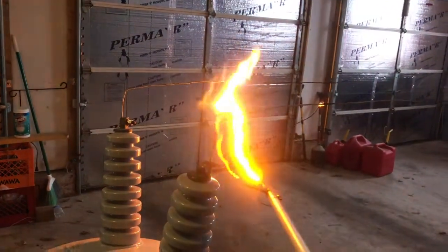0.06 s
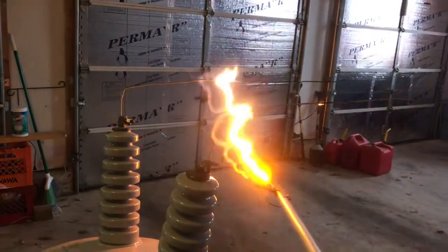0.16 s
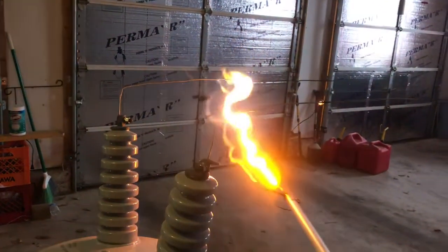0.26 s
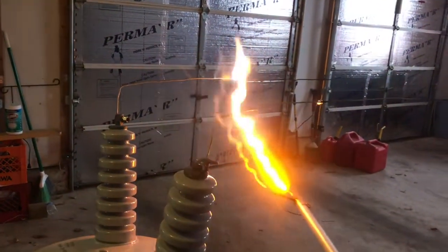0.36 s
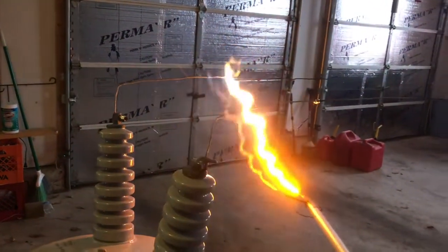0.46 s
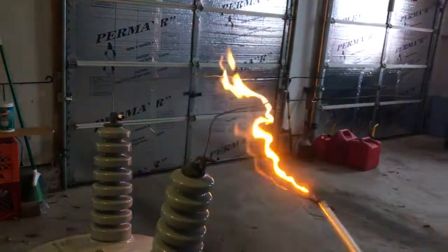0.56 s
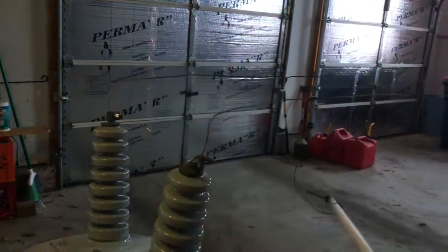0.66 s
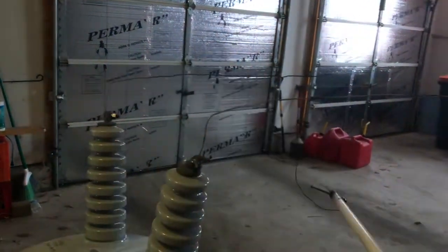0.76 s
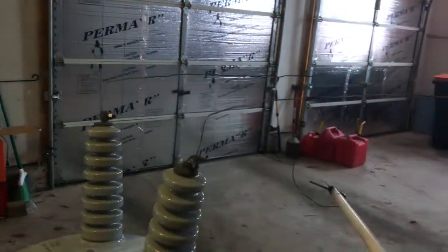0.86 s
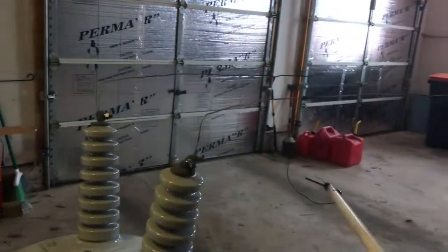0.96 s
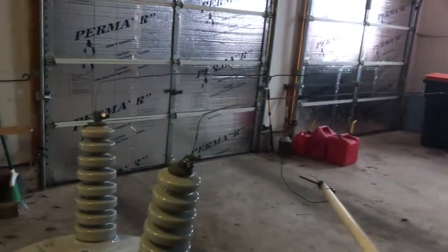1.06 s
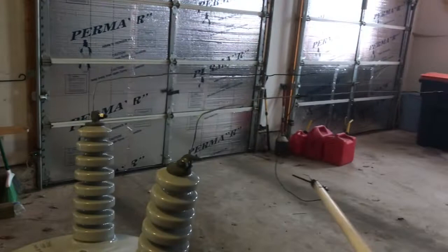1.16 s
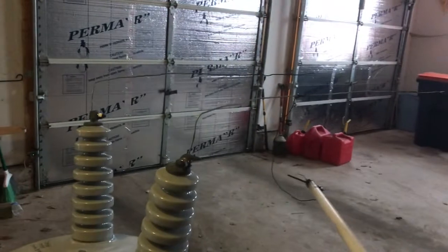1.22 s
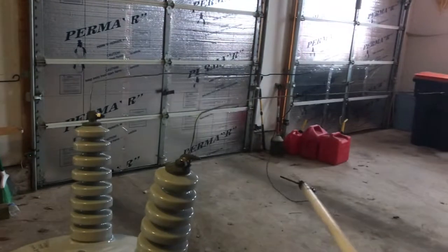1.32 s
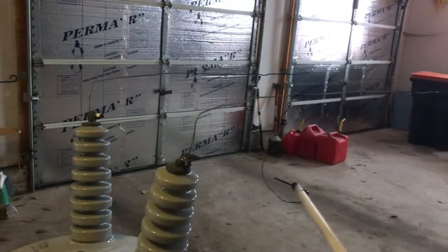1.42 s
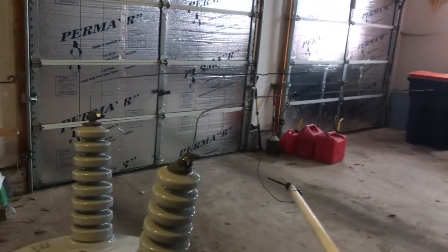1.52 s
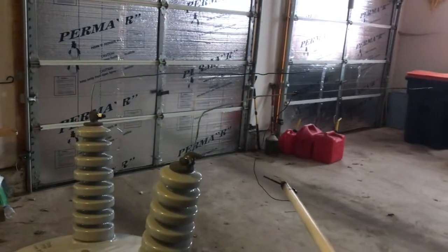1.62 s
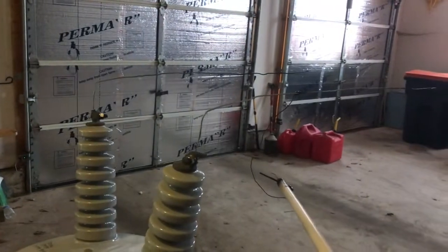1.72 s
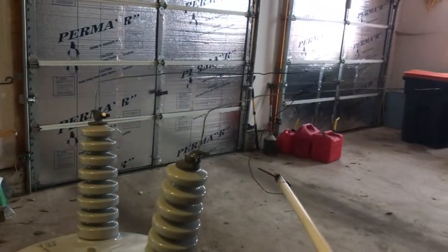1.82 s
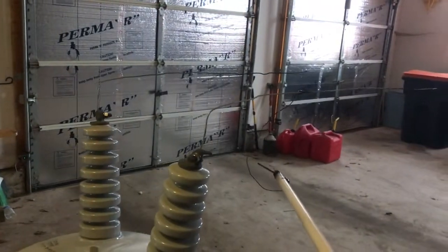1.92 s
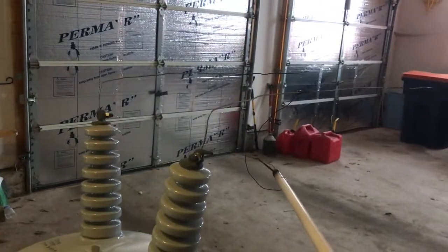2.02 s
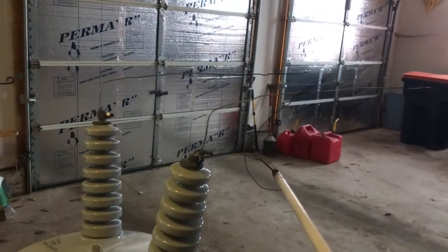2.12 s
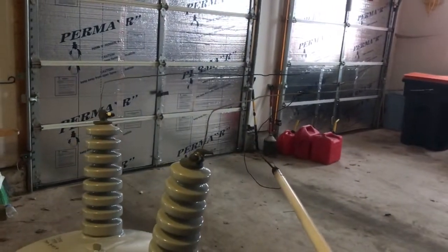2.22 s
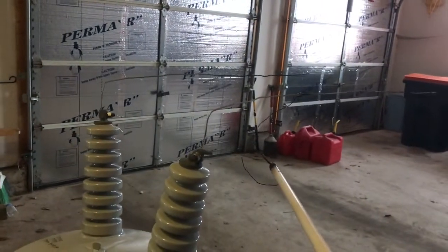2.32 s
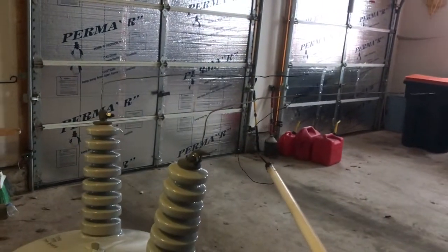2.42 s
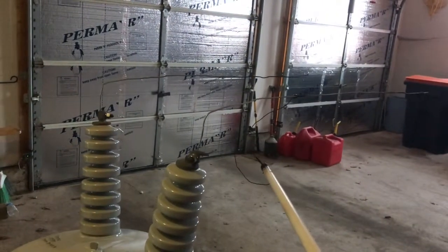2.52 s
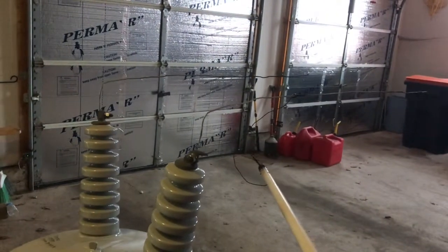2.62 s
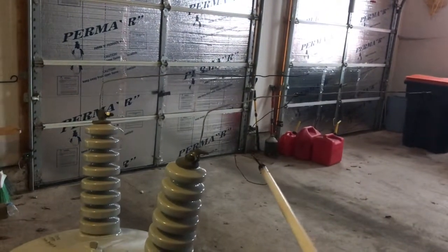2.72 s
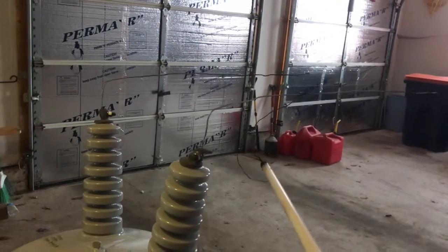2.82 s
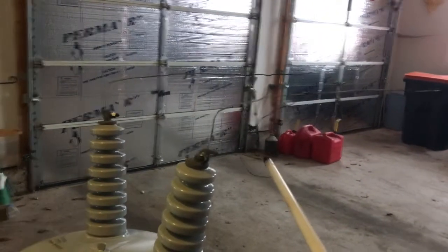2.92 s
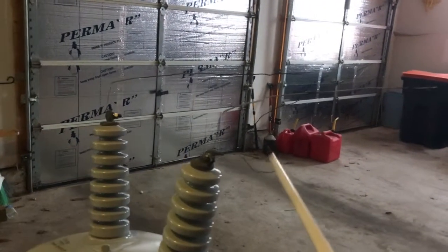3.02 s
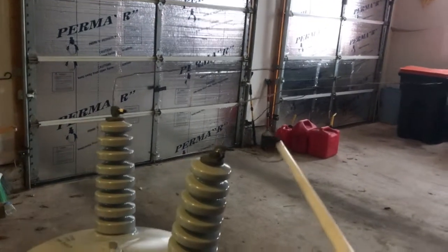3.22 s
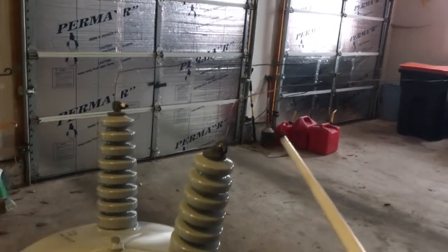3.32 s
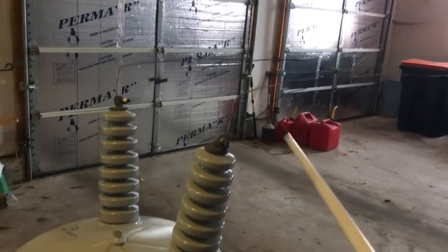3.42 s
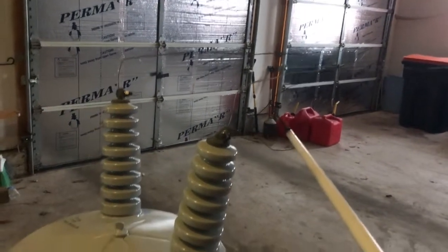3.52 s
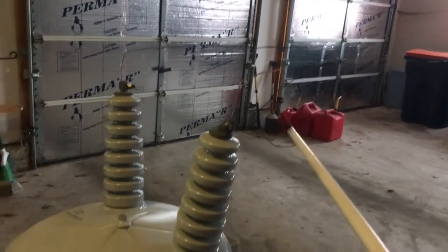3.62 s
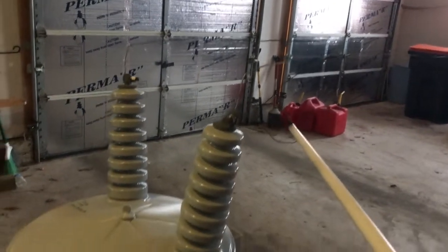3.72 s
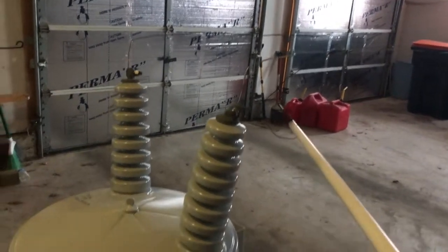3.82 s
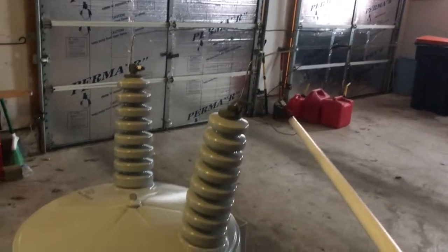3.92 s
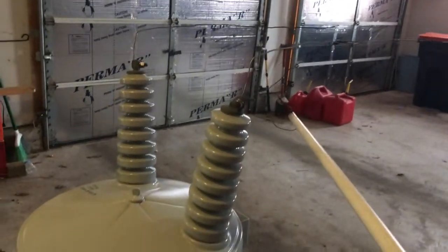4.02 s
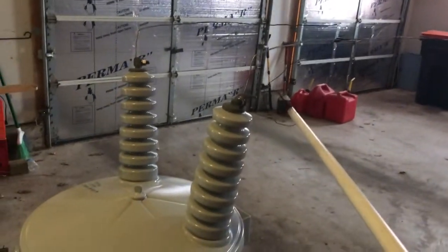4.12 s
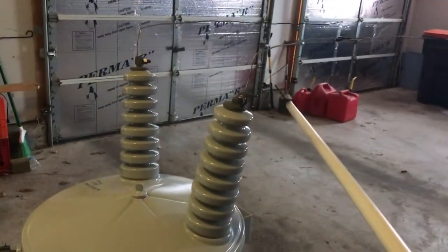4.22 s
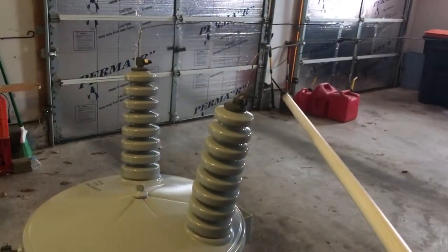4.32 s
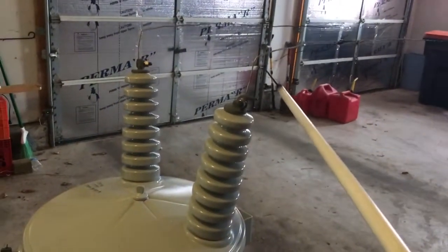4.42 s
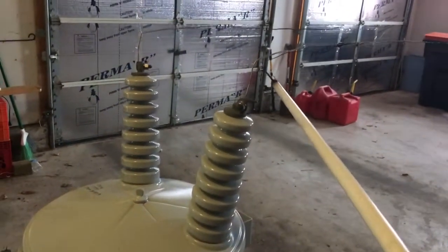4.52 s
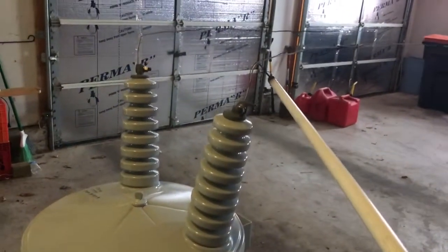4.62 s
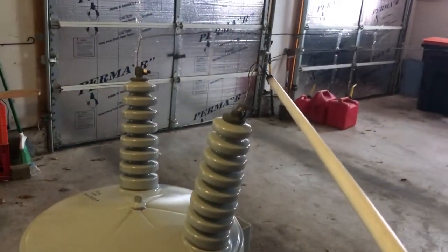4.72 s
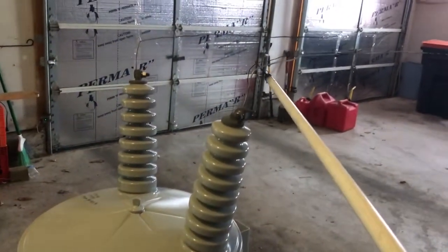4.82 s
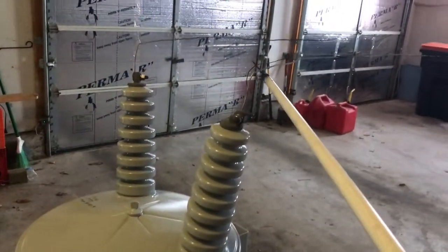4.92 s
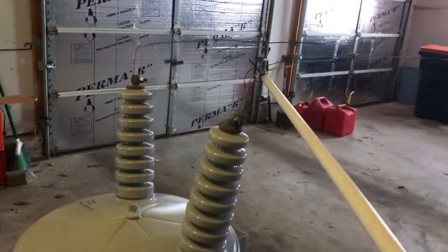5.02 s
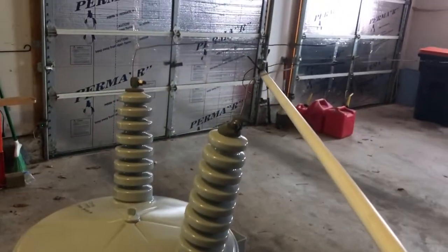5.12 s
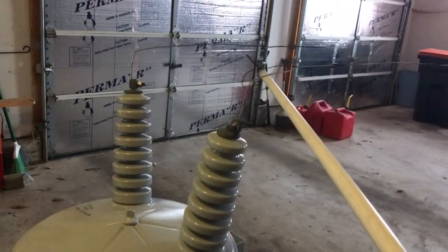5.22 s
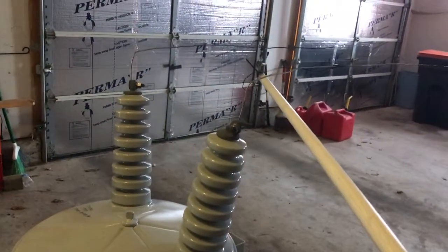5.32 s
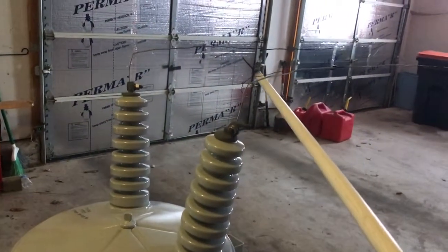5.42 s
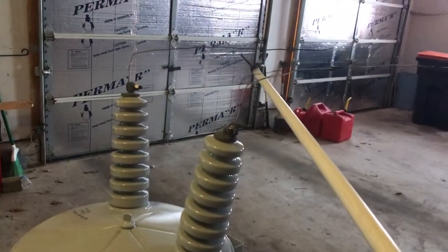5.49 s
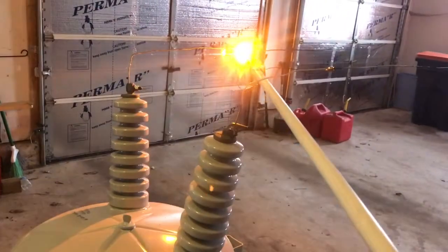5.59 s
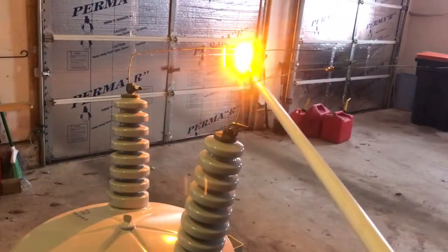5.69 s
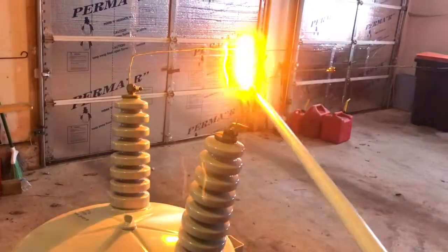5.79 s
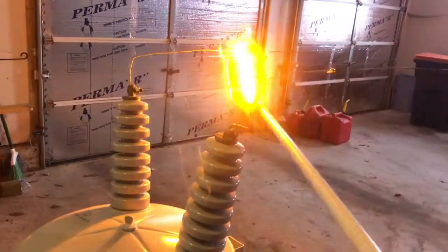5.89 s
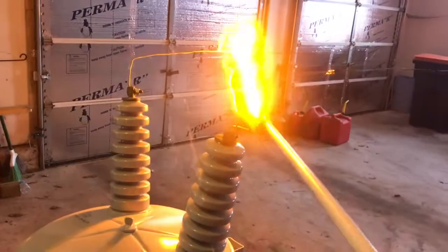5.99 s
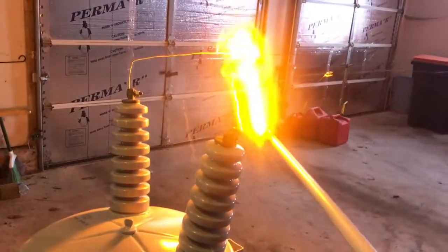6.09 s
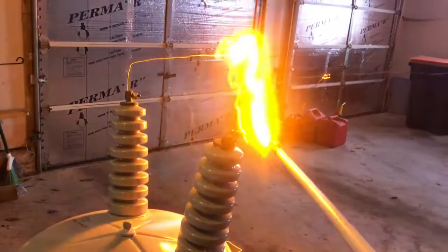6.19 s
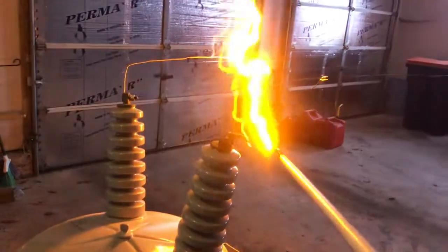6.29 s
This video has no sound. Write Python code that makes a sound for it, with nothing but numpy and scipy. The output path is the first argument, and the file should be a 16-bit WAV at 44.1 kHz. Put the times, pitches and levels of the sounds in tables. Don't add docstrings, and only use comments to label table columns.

```python
import sys
import numpy as np
from scipy import signal
from scipy.fft import rfft, irfft, next_fast_len
from scipy.io import wavfile
from scipy.ndimage import map_coordinates

SR = 44100
rng = np.random.default_rng(int(sys.argv[2]) if len(sys.argv) > 2 else 0)


def magnitude_from_level(level_db):
    exponent = np.asarray(level_db, float) / 20
    return 10 ** exponent


def output_pcm(signal):
    pcm = np.clip(np.atleast_2d(signal).T, -1, 1) * 32767
    wavfile.write(sys.argv[1], SR, np.round(pcm).astype(np.int16))


N = 280035
T = np.arange(N) / SR
MAINS_HZ, HEAT_PEAK_S = 60.035, 0.0682
TEAR_S = 0.652


def in_time(rows):
    s, *columns = np.transpose(rows)
    return [np.interp(T, s, c) for c in columns]


def while_on(rows, fade_s=0.049):
    start_s, end_s = rows[0][0], rows[-1][0]
    rise = T - start_s + fade_s * (start_s == 0)
    fall = end_s - T + fade_s
    return np.clip(np.minimum(rise, fall) / fade_s, 0, 1)


def at_hz(points, hz):
    point_hz, value = np.transpose(points)
    return np.interp(np.log(hz + 1), np.log(point_hz), value)


def colour(x, points):
    size = next_fast_len(N + 4096)
    gain = magnitude_from_level(at_hz(points, np.fft.rfftfreq(size, 1 / SR)))
    return irfft(rfft(x, size) * gain, size)[:N]


def rms_one(x):
    return x / np.sqrt(np.mean(x ** 2) + 1e-20)


def butter(x, hz, kind, order=2):
    return signal.sosfilt(signal.butter(order, hz, kind, fs=SR, output="sos"), x)


def steep_top(x, hz):
    return signal.sosfilt(signal.cheby2(14, 60, hz, fs=SR, output="sos"), x)


def drift(rate_hz):
    knots = rng.standard_normal(400)
    coarse = map_coordinates(knots, [T[::64] * min(rate_hz, 60)], order=3)
    return np.interp(T, T[::64], coarse)


def place(times_s, pulses):
    out = np.zeros(N + 8192)
    for s, pulse in zip(times_s, pulses):
        start = round(s * SR)
        out[start:start + len(pulse)] += pulse
    return out[:N]


def mains(order, lead_rad=0.):
    return np.sqrt(2) * np.cos(2 * np.pi * order * MAINS_HZ * (T - HEAT_PEAK_S) + lead_rad)


# collapse_s, standing_share
COLLAPSE = [
    (0.0464, 1),
    (0.0065, 0.69),
    (0.016, -0.79),
]


def after_tear(collapse_s, share):
    u = np.maximum(T - TEAR_S, 0) * (T < 3)
    standing = magnitude_from_level(-105 * u)
    return (1 + share) * np.exp(-u / collapse_s) - share * standing


# time_s, heating_db, writhing_db, turbulence_db
ARCS = [
    [(0, -26, -3, -2.5), (.1, -25.5, -6, -7), (.178, -23.5, -4, -1.5), (.26, -25.5, 1, -4.5),
     (.35, -26.5, 4.5, -2.5), (.45, -25, -5, -3), (.54, -25.5, 0.5, 2), (.645, -24.5, -3, -8)],
    [(5.74, -37.5, 2, -16), (5.8, -50.5, 6, -14), (5.93, -36, 3.5, -12), (6.06, -33.5, 2, -9),
     (6.115, -29, 0, 6), (6.24, -26.5, -2, -3), (6.32, -26, -1, 8), (6.35, -21.5, -7, 1)],
]
# second_partial_db, upper_orders_db, wander_0_1, roar_db, hiss_db, tick_db
ARC_VOICE = [
    (-3, -10.5, 0.88, -38, -4.5, -39.5),
    (-7.5, -12, 0.03, -54.5, 2.5, -24.5),
]
# pitch_hz, level_db
ARC_ORDERS = [
    [(180, -3), (300, -51), (360, 1), (420, -32), (480, -5), (540, -12), (600, 0.5), (660, -10.5),
     (720, -7)],
    [(180, -21), (360, 2.5), (480, -6.5), (540, -24), (600, 1.5), (720, -13), (840, -19), (1080, -8),
     (1200, -42), (1320, -22), (1560, -28), (1920, -20), (2400, -22)],
]


def arc_hum():
    first, second, rest = [after_tear(*row) for row in COLLAPSE]
    out = 0
    for rows, orders, (second_db, upper_db, wander, *_) in zip(ARCS, ARC_ORDERS, ARC_VOICE):
        heat_db, writhe_db, _ = in_time(rows)
        upper = 0
        for hz, db in orders:
            level_db = db + 2.0 * wander * drift(14) + 1.04 * writhe_db * (hz > 1000)
            lead_rad = rng.uniform(-np.pi, np.pi) + 0.24 * wander * drift(7.4)
            upper = upper + magnitude_from_level(level_db) * mains(round(hz / MAINS_HZ), lead_rad)
        second_gain = magnitude_from_level(second_db + 0.53 * writhe_db)
        low = first * mains(2, 0.088)
        low = low + second * second_gain * mains(4, -0.45 + 0.72 * wander * drift(20))
        heard = while_on([rows[0], [rows[-1][0] + 1]])
        out = out + heard * magnitude_from_level(heat_db) * (low + rest * magnitude_from_level(upper_db + writhe_db - 3.5) * upper)
    return out


# pitch_hz, density_db_per_hz
ROAR = [(60, -42), (150, 3), (300, 1), (700, -1.5), (1200, 0.5), (2550, -11), (4000, -25), (9000, -28),
        (16000, -38)]


def arc_roar():
    heat = (1 + mains(1.8, 1.28) / np.sqrt(2)) / 2
    flutter = magnitude_from_level(0.34 * drift(60) + 1.35 * mains(0.99, 1.53))
    noise = rms_one(colour(rng.standard_normal(N), ROAR)) * (0.36 + heat ** 2) * flutter
    dull = butter(noise, 4400, "low", order=4)
    hiss = noise - dull

    zeros_s = HEAT_PEAK_S + (np.arange(-8, 754) + 0.42) / (2 * MAINS_HZ)
    count = len(zeros_s)
    odd, chance = np.arange(count) % 2, rng.standard_normal(count)
    grains = rng.standard_normal((count, 40)) * np.exp(-np.arange(40) / 6.3)
    grains = grains / np.std(grains, axis=1, keepdims=True) / 3

    out = 0
    tick_spread_db, tick_odd_db = (6.0, 1.5), (-3, -16)
    for rows, voice, spread_db, odd_db in zip(ARCS, ARC_VOICE, tick_spread_db, tick_odd_db):
        *_, roar_db, hiss_db, tick_db = voice
        swirl_db = in_time(rows)[-1]
        tick_gain = magnitude_from_level(spread_db * chance + odd_db * odd)[:, None]
        ticks = butter(place(zeros_s, grains * tick_gain), 5700, "high")
        turbulent = magnitude_from_level(swirl_db) * dull + magnitude_from_level(hiss_db + 0.27 * swirl_db) * hiss
        out = out + while_on(rows) * (magnitude_from_level(roar_db + 5.5) * turbulent + magnitude_from_level(tick_db - 4.5) * ticks)
    return out


# start_s, peak_db, crack_hz
SPARKS = [(.002, -33.5, 7000), (0.0645, -14.5, 5460), (.0964, -26.5, 8000), (.1466, -24, 4650),
          (0.1543, -27, 12000), (0.1707, -26.5, 10000), (0.395, -40, 9000), (0.413, -37, 9000),
          (0.422, -27, 9000), (0.4234, -19, 6750), (0.4293, -34, 6000), (.4375, -36, 9000),
          (0.454, -28, 8000), (0.471, -24, 6700), (.4875, -30, 10000), (0.4979, -25, 4800),
          (0.6134, -14.5, 5600), (5.6057, -31.5, 5800), (5.6226, -31.5, 5700), (5.6383, -30, 6050),
          (5.6477, -1.5, 10350), (6.018, -36, 9900), (6.0862, -27, 9700), (6.103, -30.5, 8000),
          (6.105, -38.5, 3750), (6.2348, -29.5, 10000), (6.252, -30, 11000), (6.2612, -11.5, 4750),
          (6.2697, -18.5, 10000)]


def sparks():
    s, peak_db, crack_hz = np.transpose(SPARKS)[:, :, None]
    t, peak_s = np.arange(220) / SR, 0.0008
    body_db = 0.5 - 19 * np.log2(crack_hz / 5000)
    crack = np.exp(-((t - peak_s) * crack_hz / 0.44) ** 2) * np.sin(2 * np.pi * crack_hz * (peak_s - t))
    body = butter(1. * (np.arange(220) == 34), [800, 3300], "band")
    crackle = rng.standard_normal((len(s), 220)) * np.exp(-t / 0.001) * (t > peak_s)
    crackle = butter(crackle, 1900, "high")
    clean = magnitude_from_level(peak_db) * (1.53 * crack + 9.35 * magnitude_from_level(body_db) * body)
    restrike = (s > 5.6) & (s < 5.7)
    room_db = np.where(restrike, 4.5, -5.5)
    direct = place(s[:, 0], clean + 0.5 * magnitude_from_level(peak_db) * crackle)
    return direct, place(s[:, 0], clean * magnitude_from_level(room_db))


def puff():
    push = butter(-1. * (np.arange(1500) == 0), [134, 427], "band")
    direct = place([TEAR_S], [magnitude_from_level(-23) * push / np.abs(push).max()])
    return direct, magnitude_from_level(2.5) * direct


# pitch_hz, level_db
CLACK = [(200, 8.5), (400, 3), (600, 11.5), (800, -4), (1500, 1.5), (3000, -4), (5000, -8.5), (7000, 3),
         (9000, -2.5), (12000, -12.5), (16000, -15)]


def clack():
    start_s, peak_db, room_db, build_s = 3.329, -20.5, -21, 0.0018
    t = np.arange(600) / SR
    contacts = rng.standard_normal(600) * (rng.random(600) < 0.12)
    contacts = contacts * (t / build_s) * np.exp(1 - t / build_s)
    direct = place([start_s], [magnitude_from_level(peak_db) * contacts / np.abs(contacts).max()])
    blow = place([start_s], [[magnitude_from_level(room_db + 11)]])
    return colour(direct, CLACK), colour(blow, CLACK)


# start_s, peak_db, ring_hz, rattle_s
CLICKS = [(1.3668, -46.5, 2130, .004), (1.83, -62, 1240, .004), (2.022, -46, 6150, .001),
          (2.029, -53.5, 2650, .004), (2.029, -48, 7950, .001), (2.191, -53, 1370, .005),
          (2.536, -45.5, 2040, .004), (2.54, -51, 6000, .002), (2.6158, -43, 1610, .002),
          (2.898, -41.5, 1140, .001), (2.966, -63, 960, .002), (3.1794, -52, 2060, .003)]


def clicks():
    t, pulses = np.arange(500) / SR, []
    shape = (len(CLICKS), 500)
    touches = rng.standard_normal(shape) * (rng.random(shape) < 0.04)
    for (s, db, hz, rattle_s), touch in zip(CLICKS, touches):
        hits = (t == 0) + touch * (t < rattle_s)
        rung = butter(hits, [hz / 4, hz * np.sqrt(2)], "band", order=3)
        pulses.append(magnitude_from_level(db) * rung / np.abs(rung).max())
    s, db = np.transpose(CLICKS)[:2]
    room_db = -45 - db + 0.33 * (db - db.mean())
    feed = place(s, pulses * magnitude_from_level(room_db)[:, None])
    return place(s, pulses), butter(feed, 2330, "low")


# start_s, peak_db, pitch_hz
THUMPS = [(0.346, -27, 114), (1.234, -39, 122), (1.248, -13, 123.7), (2.019, -67, 116), (2.287, -30, 121),
          (2.314, -43, 130), (2.444, -17.5, 117), (2.603, -35, 131), (2.826, -41.5, 103),
          (3.099, -37.5, 112), (3.17, -43, 108), (3.22, -43, 116), (3.272, -40, 113), (3.511, -43.5, 111),
          (3.578, -45, 114), (3.67, -28.5, 109), (3.743, -39, 112), (3.805, -40.5, 124),
          (3.819, -34, 116.4), (3.844, -24.5, 113), (4.272, -44, 117), (4.465, -46.5, 114),
          (4.613, -31, 125), (5.043, -31, 140), (5.092, -32.5, 116), (5.429, -43, 136), (5.647, -39.5, 123),
          (5.73, -38, 121)]


def thumps():
    t, pulses = np.arange(3000) / SR, []
    for s, db, hz in THUMPS:
        cycles = hz * (0.68 * t + 0.01 * (1 - np.exp(-t / 0.0049)))
        swell = (t * hz / 1.134) ** 2.6 * np.exp(2.56 * (1 - t * hz / 1.112))
        pulses.append(-magnitude_from_level(db) * np.sin(2 * np.pi * cycles) * swell)
    return place(np.array(THUMPS)[:, 0], pulses)


# start_s,
# peak_db, ring_hz
KNOCKS = [(1.237, -41, 523), (1.249, -36, 406), (2.286, -54, 350), (2.314, -35, 530), (2.444, -70, 400),
          (2.601, -42.5, 305), (2.9, -51, 350), (2.913, -51, 260), (2.9185, -46, 300), (2.929, -48, 298),
          (3.328, -36.5, 590), (3.812, -52, 510), (3.847, -46, 454), (4.259, -54, 398), (4.607, -47, 380),
          (5.046, -62, 343), (5.086, -45, 394), (5.431, -38.5, 255), (5.435, -32, 533), (5.651, -30, 394)]


def knocks():
    t, pulses = np.arange(600) / SR, []
    for s, db, hz in KNOCKS:
        swing = np.sin(2 * np.pi * hz * t) * np.exp(-t * hz / 0.85)
        pulses.append(magnitude_from_level(db + 3.5) * swing * (1 - np.exp(-t / 0.00076)))
    return place(np.array(KNOCKS)[:, 0], pulses)


# mains_order, level_db
WHINE = [(52, -13), (54, -11), (58, 0), (60, -1), (62, -9), (64, -13), (66, -13), (68, -14), (70, -13),
         (114, -14), (118, -7), (120, -7), (122, -9)]


def ballast_whine():
    sway_period_s, sway_peak_s = 2.5, 2.8
    sway_db = 4 * np.cos(2 * np.pi * (T - sway_peak_s) / sway_period_s)
    out = 0
    for order, db in WHINE:
        line_sway_db = sway_db * (-1) ** (order // 2) * (order < 100)
        out = out + magnitude_from_level(db + 1.5 * drift(2.5) + line_sway_db) * mains(order, 0.5 * drift(5))
    approach_db = 1.0 * (T - T.mean())
    return magnitude_from_level(-80 + approach_db) * out


# mains_order, level_db
TRANSFORMER = [(1, -8.5), (2, -2.5), (4, -6.5), (6, -11)]


def transformer_hum():
    partials = [magnitude_from_level(db + 3.7 * drift(5.6)) * mains(order, drift(2.024)) for order, db in TRANSFORMER]
    return magnitude_from_level(-67) * sum(partials)


# time_s, level_db
GRIP = [(0, -51), (1.1, -62.5), (1.9, -61), (2.4, -56.5), (3.1, -57.5), (3.32, -48.5), (3.45, -61),
        (3.8, -57), (4.1, -62), (6.35, -60)]
# pitch_hz, density_db_per_hz
RUMBLE = [(15, -52), (30, -17.5), (60, 8.5), (100, -4.5), (160, -13), (300, -15.5), (600, -71)]
# pitch_hz, density_db_per_hz
AIR = [(100, -7.5), (200, -7), (350, -11.5), (500, -15), (1000, -18.5), (2600, -23), (3000, -25),
       (4800, -25), (5800, -22), (7800, -25.5), (8900, -23), (10500, -29), (14700, -27), (16500, -44)]


def rumble_and_air():
    grip_db, = in_time(GRIP)
    rumble = rms_one(colour(rng.standard_normal(N), RUMBLE)) * magnitude_from_level(grip_db + 2.5 * drift(14))
    air_db = -67.5 + 0.05 * (grip_db - grip_db.mean())
    air = rms_one(colour(rng.standard_normal(N), AIR)) * magnitude_from_level(air_db)
    return rumble + air


# delay_s, level_db
ECHOES = [(.0043, -11), (.0075, -12), (.0143, -6), (.024, -14), (.036, -10)]


def echoes(x):
    return sum(magnitude_from_level(db) * np.pad(x, (round(s * SR), 0))[:N] for s, db in ECHOES)


# pitch_hz, t60_s
ROOM_T60 = [(120, 0.86), (500, 0.92), (1400, 1), (3700, 0.98), (9000, 0.51), (16000, 0.38)]


def garage(x):
    t = np.arange(round(1.3 * SR)) / SR
    edges_hz = 75 * 2 ** np.arange(0, 8.4, 0.5)
    white = rng.standard_normal((2, len(t)))
    tail = 0
    for k, (low, high) in enumerate(zip(edges_hz, edges_hz[1:])):
        decay = magnitude_from_level(-60 * t / at_hz(ROOM_T60, np.sqrt(low * high)))
        tail = tail + butter(white[k % 2], [low, high], "band") * decay
    grain = np.repeat(rng.standard_normal(len(t) // 40 + 1), 40)[:len(t)]
    tail = tail * (1 - np.exp(-t / 0.0086)) * magnitude_from_level(5.7 * grain * np.exp(-t / 0.051))
    return signal.fftconvolve(x, tail / np.sqrt(np.sum(tail ** 2)))[:N]


# pitch_hz, level_db
MIC = [(500, -0.5), (2000, -4.5), (2550, 2), (3050, -3), (3600, 6.5), (4700, 3), (5900, 4.5), (6500, 0),
       (7200, 4), (8000, -2.5), (8700, 6.5), (9600, 1), (10300, -2), (12000, -0.5)]


def scene():
    spark, spark_feed = sparks()
    click, click_feed = clicks()
    knocked, knocked_feed = clack()
    puffed, puffed_feed = puff()
    roar = arc_roar()
    feed = spark_feed + click_feed
    tail = garage(feed + knocked_feed + puffed_feed + magnitude_from_level(-2.5) * roar)
    diffuse = click + knocked + puffed + roar + magnitude_from_level(-8) * echoes(feed) + tail
    heard = colour(spark + steep_top(diffuse, 16100), MIC)
    background = rumble_and_air() + ballast_whine() + transformer_hum()
    return (heard + arc_hum() + thumps() + knocks() + steep_top(background, 16100))[None]


def band_limit(x):
    return signal.sosfilt(signal.butter(12, 16820, fs=SR, output="sos"), x)


def record(dry):
    rounded = 1.096 * np.tanh(dry / 1.093)
    mix = steep_top(rounded, 16750)
    return band_limit(mix)


dry = scene()
out = record(dry)
output_pcm(out)
```